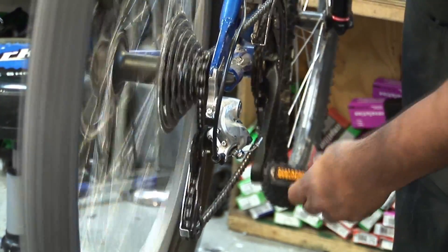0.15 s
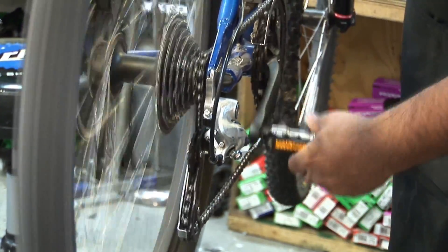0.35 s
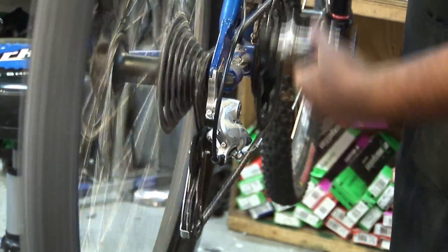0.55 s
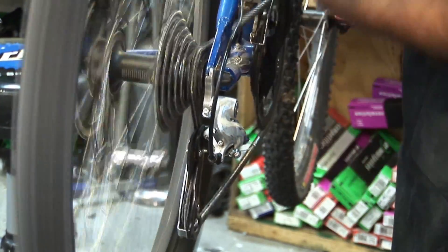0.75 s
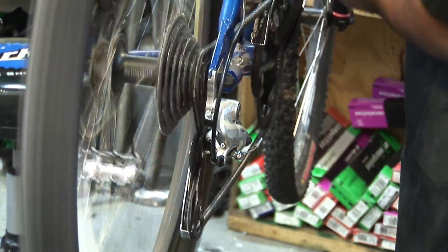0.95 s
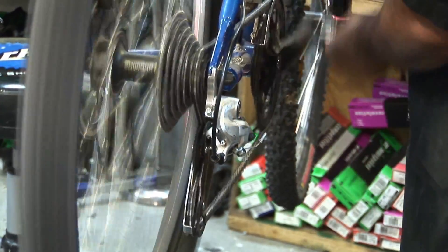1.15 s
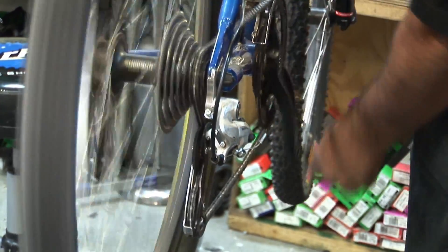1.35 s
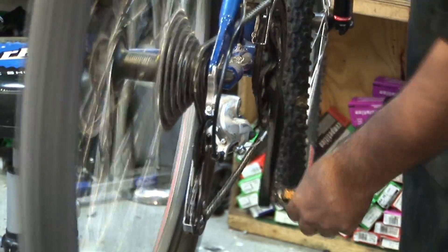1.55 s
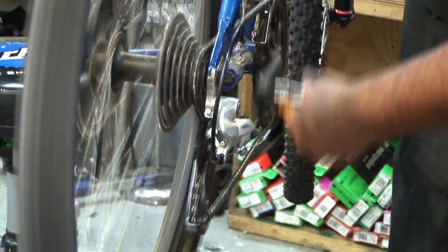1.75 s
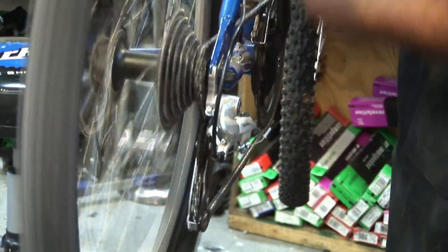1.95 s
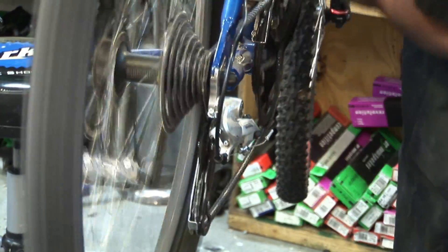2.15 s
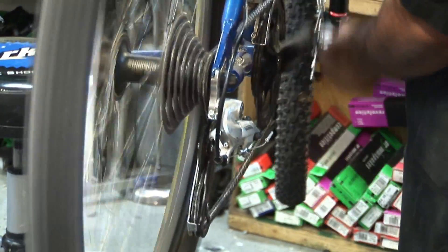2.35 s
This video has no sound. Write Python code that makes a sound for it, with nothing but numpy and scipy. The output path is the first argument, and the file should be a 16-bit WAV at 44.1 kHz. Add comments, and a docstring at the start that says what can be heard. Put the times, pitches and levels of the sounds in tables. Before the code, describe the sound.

A bike chain clacks across rear cogs with crisp metallic clicks while the crank is hand-turned

```python
"""In a small hard workshop, a bicycle on a stand is shifted while the crank is turned by hand.
The shift lever snaps: very short knocks, a low body and a brief ring of fading tones.
The chain clatters onto a cog and its links tick in the treble: runs of tiny random knocks, filtered.
The room adds reflections and a tail, over a faint whirr of random patter, low noise and a hum."""
import sys
import numpy as np
from scipy import signal
from scipy.fft import rfft, irfft
from scipy.io import wavfile
from scipy.ndimage import uniform_filter1d

SR = 44100
rng = np.random.default_rng(int(sys.argv[2]) if len(sys.argv) > 2 else 0)


def to_wav(sig):
    """Store sig (one row per channel, or 1-D mono) as 16-bit WAV at the path in sys.argv[1].

    Samples outside -1..1 are clipped; the rate is SR.
    """
    pcm = np.clip(np.atleast_2d(sig), -1, 1) * 32767
    pcm = np.round(pcm).astype(np.int16)
    wavfile.write(sys.argv[1], SR, pcm.T)  # frames by channels


N = 105354  # length in samples


def amp(db):
    """Turn decibels into a plain multiplier."""
    return 10 ** (np.asarray(db) / 20)


def evened(x):
    """Scale a sound to an average (RMS) strength of 1."""
    return x / np.sqrt(np.mean(x ** 2) + 1e-20)


def read(points, hz):
    """Read a curve of (frequency, value) points, joined by straight lines over log frequency."""
    f, value = np.transpose(points)
    return np.interp(np.log(hz + 1), np.log(f + 1), value)


def add(mix, s, sound):
    """Lay a sound into the mix at s seconds, or at the start if s is negative."""
    part = mix[max(round(s * SR), 0):][:len(sound)]
    part += sound[:len(part)]


def coloured(x, points):
    """Filter with the given spectrum, which drops 30 dB an octave past each end; filter energy is 1."""
    hz = np.fft.rfftfreq(4096, 1 / SR)
    low_end = (points[0][0] / 2, points[0][1] - 30)
    high_end = (points[-1][0] * 2, points[-1][1] - 30)
    log = np.log(amp(read([low_end] + list(points) + [high_end], hz)))
    # minimum phase: the filter answers at once, with nothing ahead of the sound
    both_sides = np.r_[log, log[-2:0:-1]]
    taps = np.fft.ifft(np.exp(np.conj(signal.hilbert(both_sides)))).real[:2048]
    return signal.oaconvolve(x, taps / np.linalg.norm(taps))[:len(x)]


def rattle(rise, length, per_s, spread_db):
    """Many tiny knocks of uneven strength over a little hiss, rising and then dying away."""
    t = np.arange(4000) / SR
    chance = rng.random(len(t))
    strength = rng.exponential(1, len(t))
    hiss = rng.standard_normal(len(t))
    hits = chance < per_s / SR
    knocks = np.sign(hiss) * amp(spread_db * np.minimum(strength, 4)) * hits + 0.3 * hiss
    rising = np.minimum(t / max(rise, 1e-4), 1)
    dying = np.exp(-(t / np.clip(length, .001, .04)) ** 2)
    return evened(knocks) * rising * dying


def whirr():
    """Links running over teeth: a fine random patter whose level wavers a little."""
    # colour of the patter: f/Hz, level per Hz/dB
    patter_colour = [(900, -13.5), (1300, -3.5), (2000, -19), (2900, -2.5), (4200, -10.5), (7000, -24.5),
                     (9000, -20), (12000, -16), (16000, -22)]
    level_db, knocks_per_s = -63.5, 7000
    size = amp(1.0 * np.minimum(rng.exponential(1, N), 4))
    patter = size * (rng.random(N) < knocks_per_s / SR) * rng.choice([-1, 1], N)
    swell = evened(uniform_filter1d(uniform_filter1d(rng.standard_normal(N), 1500), 1500))
    return amp(level_db + 0.8 * swell) * evened(coloured(patter, patter_colour))


def air():
    """Low room noise, a narrow band of rumble and a faint hum whose level wavers."""
    # colour of the room noise: f/Hz, level per Hz/dB
    noise_colour = [(20, -34), (40, -7), (80, -11.5), (130, -4), (200, -12), (260, -7), (330, -13.5),
                    (500, -11.5), (1000, -17.5), (3000, -12.5), (6000, -72)]
    noise_db, rumble_db, hum_db = -64, -73.5, -69.5  # the hum level is a peak, before its wavering
    rumble_hz, rumble_width_hz, hum_hz = 57, 14, 147.8
    hz, t = np.fft.rfftfreq(N, 1 / SR), np.arange(N) / SR
    noise = irfft(rfft(rng.standard_normal(N)) * amp(read(noise_colour, hz)) * (hz > 20), N)
    rumble_band = np.exp(-((hz - rumble_hz) / rumble_width_hz) ** 2)
    rumble = irfft(rfft(rng.standard_normal(N)) * rumble_band, N)
    waver = evened(uniform_filter1d(rng.standard_normal(N), 3000))
    hum = amp(hum_db + 0.99 * waver) * np.sin(2 * np.pi * hum_hz * t)
    return amp(noise_db) * evened(noise) + amp(rumble_db) * evened(rumble) + hum


def lever():
    """A pawl touches, then snaps home: a very short knock, a low body knock, a frame thump and a ring."""
    # lever snaps: t/s, level/dB, knock f/Hz, dull part/dB, low body/dB (parts relative to the snap)
    snaps = [(.0015, -22.5, 3730, -15.5, -30.5), (.0425, -20, 3830, -18, -36),
             (.8315, -47.5, 2940, -10, -24), (0.918, -44.5, 3270, -2.5, -32),
             (.9620, -14.5, 3430, -14.5, -38.5), (1.1227, -22, 4220, -3, -36),
             (1.6491, -37, 3200, -11.5, -35), (1.6863, -17.5, 3910, -7, -34.5),
             (1.8385, -18, 3970, -5.5, -31), (2.1322, -29, 2970, -19, -21.5),
             (2.1456, -20.5, 4070, -8.5, -41), (2.2844, -33.5, 2330, 2, -32), (2.2869, -24, 3930, -16, -35)]
    # ringing tones of the lever: f/Hz, level before random spread/dB, time to fall 60 dB/s
    lever_tones = [(1642, -9, 0.089), (2070, -8, 0.011), (2462, 5.5, 0.032), (2640, -22, 0.052),
                   (3063, 5.5, 0.011), (3464, 2.5, 0.045), (3670, -7, 0.017), (3700, -18, .015),
                   (3806, 13, 0.011), (4470, -8, 0.017), (5440, -21, 0.043), (9170, -34, 0.041)]
    touch_lead_s, touch_db = 0.001371, -16  # the pawl touches just before it snaps
    early_lead_s, early_db, early_hz = 0.00271, -32.5, 1980  # a faint dull knock arrives first
    snap_s, ring_db = 0.00015, -17.5
    dull_hz, crack_hz, crack_db = 2430, 5940, -16.5
    body_hz, body_s = (907, 1080), 0.0017
    thump_hz, thump_db, thump_s = 254.7, -49.5, 0.016  # the frame answers each snap
    centre_s = .001  # each puff is centred this long after its start

    out, t = np.zeros(N), np.arange(6000) / SR
    late = t - centre_s

    def puff(hz, s):
        """A few swings of a tone under a bell-shaped envelope of width s."""
        return np.exp(-(late / s) ** 2 / 2) * np.sin(2 * np.pi * hz * late)

    def swell(s):
        """An envelope that peaks at 1 after s seconds, then dies away."""
        return (t / s) * np.exp(1 - t / s)

    body = sum(np.sin(2 * np.pi * f * t) for f in body_hz) * swell(body_s)
    thump = amp(thump_db) * np.sin(2 * np.pi * thump_hz * t) * swell(thump_s)
    ring_rise = np.minimum(t / 0.000855, 1) ** 2
    for s, db, hz, dull_db, body_db in snaps:
        phases = rng.random(len(lever_tones))
        spreads = rng.standard_normal(len(lever_tones))
        knock = puff(hz, snap_s)
        knock = knock + amp(dull_db) * puff(dull_hz, 1.53 * snap_s)
        knock = knock + amp(crack_db) * puff(crack_hz, 0.53 * snap_s)
        ring = np.zeros(len(t))
        for (f, tone_db, t60), phase, spread in zip(lever_tones, phases, spreads):
            # a snap with a stronger dull part also rings more in the lower tones
            start_db = tone_db + 1.8 * spread + (dull_db + 4.5) * (f < 2700)
            ring += amp(start_db - 60 * t / t60) * np.sin(2 * np.pi * (f * t + phase))
        ring *= ring_rise
        at = s - centre_s
        add(out, at - early_lead_s, amp(db + early_db) * puff(early_hz, 0.001))
        add(out, at - touch_lead_s, amp(db + touch_db) * (knock + amp(ring_db + 8) * ring))
        add(out, at, amp(db) * (knock + thump + amp(body_db) * body + amp(ring_db) * ring))
    return out


def chain():
    """The chain drops onto a cog in a short clatter with a thud through the frame; links tick above it."""
    # chain landings: t/s, level before trim/dB, rise/s, length/s, low thud/dB, bright part/dB
    # (thud and bright part are relative to the clatter)
    landings = [(0.154, -59.5, 0.0022, 0.01, -20, 17.5), (0.169, -46.5, 0.0012, 0.0079, -28, 9.5),
                (0.182, -28, 0.0014, 0.0067, -17, -2), (0.288, -39.5, 0.0014, 0.0059, -17, 2.5),
                (0.297, -42, 0.0026, 0.011, -3.5, -18), (0.551, -37.5, 0.00068, 0.0058, -14, 4),
                (0.697, -40.5, 0.0054, 0.0064, -13, -10), (1.002, -40, 0.0027, 0.015, -7.5, -16),
                (1.282, -27, 0.0059, 0.02, -9, -43), (1.529, -65, .002, 0.025, -18, 14),
                (1.939, -42, 0.0027, 0.0066, -20, 7), (2.047, -43, 0.002, 0.028, -8, -3.5),
                (2.078, -42, 0.0033, 0.0074, -4.5, -17), (2.109, -41.5, 0.0044, .006, -3, -1),
                (2.118, -30.5, 0.0027, .011, -6.5, 3), (2.278, -47, 0.002, 0.0074, -23, -2.5)]
    # links ticking on the jockey wheels: t/s, level before trim/dB, length (held to 0.04 at most)/s
    link_ticks = [(0.0004, -29, 0.0071), (0.0387, -32, 0.021), (0.1474, -45.5, 0.015),
                  (0.1714, -47.5, 0.036), (0.2838, -36, 0.0065), (0.38, -74, 0.017), (0.412, -56, 0.0081),
                  (0.445, -57, 0.018), (0.551, -41, 0.0079), (0.633, -54, 0.011), (0.676, -54.5, 0.014),
                  (0.725, -64, 0.011), (0.862, -54, 0.017), (0.9603, -31, 0.0087), (1.002, -35.5, 0.011),
                  (1.12, -36.5, 0.016), (1.219, -49.5, 0.034), (1.257, -50.5, 0.024), (1.289, -55.5, 0.03),
                  (1.359, -49, 0.011), (1.53, -55.5, 0.028), (1.568, -51, 0.033), (1.613, -48.5, 0.0095),
                  (1.665, -51, 0.012), (1.684, -37, 0.017), (1.835, -41.5, 0.024), (1.909, -54, 0.043),
                  (1.9604, -53.5, 0.033), (2.03, -49, 0.014), (2.049, -49.5, 0.015), (2.072, -45.5, 0.012),
                  (2.117, -29.5, 0.016), (2.137, -38.5, 0.017), (2.217, -50.5, 0.013), (2.278, -41, 0.036)]
    # colours of the four parts: f/Hz, level per Hz/dB
    clatter_colour = [(410, -42.5), (700, -6.5), (2060, -2), (2520, -5.5), (3030, -1), (6390, -35.5),
                      (9000, -36), (11700, -44), (19800, -120)]
    thud_colour = [(100, -6.5), (220, 0), (400, -2), (900, -6.5), (1500, -10), (3000, -67)]
    bright_colour = [(2000, -17.5), (3000, -4), (4000, -2.5), (5500, -16.5), (8000, -46)]
    tick_colour = [(3530, -50), (6000, -5.5), (6900, -13.5), (7520, -11), (9860, -0.5), (10700, 0.5),
                   (13800, 0), (16000, -1)]
    clatter_trim_db, tick_trim_db = -12, -11
    clatter, thud, bright, tick = np.zeros((4, N))
    for s, db, rise, length, thud_db, bright_db in landings:
        for part, part_db in ((clatter, 0), (thud, thud_db), (bright, bright_db)):
            level = amp(db + clatter_trim_db + part_db)
            add(part, s, level * rattle(rise, length, per_s=1500, spread_db=3.0))
    for s, db, length in link_ticks:
        add(tick, s, amp(db + tick_trim_db) * rattle(0.00058, length, per_s=5000, spread_db=0.83))
    out = coloured(clatter, clatter_colour) + coloured(thud, thud_colour)
    return out + coloured(bright, bright_colour) + coloured(tick, tick_colour)


def shop(x):
    """A few strong reflections, plus five tails of sparse taps whose bands die at their own speed."""
    # strong reflections: delay/s, level/dB
    reflections = [(.0036, -10), (.0065, -6.5), (.0095, -12.5), (0.0129, -20), (.017, -17)]
    # how long the tail lasts: f/Hz, time to fall 60 dB/s
    tail_t60 = [(250, 0.56), (660, 0.34), (1740, 0.24), (4590, 0.23), (12100, 0.17)]
    # colour of the tail: f/Hz, level/dB
    tail_colour = [(300, -2), (2500, -1), (3600, -3.5), (4500, -5), (7000, -2.5), (12000, 0)]
    tail_db, tail_rise_s = 2, 0.0024

    # one tap, up or down, at a random place in every 10 samples
    taps = np.zeros((5, SR // 2))
    at = np.arange(0, SR // 2 - 10, 10) + rng.integers(0, 10, (5, SR // 20 - 1))
    np.put_along_axis(taps, at, rng.choice([-1., 1.], at.shape), 1)

    # colour the taps and fade each band
    hz, t, bands = signal.stft(taps, SR, nperseg=256)
    fade_db = -60 * t / read(tail_t60, hz)[:, None]
    bands = bands * amp(read(tail_colour, hz)[:, None] + fade_db)
    tail = signal.istft(bands, SR, nperseg=256)[1]
    tail = tail * np.minimum(np.arange(tail.shape[1]) / SR / tail_rise_s, 1) ** 2

    # the feed to each tail swings at its own speed, so the mix of tails keeps changing
    swing_hz = np.arange(1, 6)[:, None] * 2 / 3
    swing = 2 * np.pi * swing_hz * np.arange(N) / SR + np.arange(5)[:, None]
    feeds = x * np.cos(swing) * np.sqrt(2 / 5)
    wet = signal.fftconvolve(feeds, tail, axes=1)[:, :N].sum(0)
    out = x + amp(tail_db) * wet / np.linalg.norm(tail[0])
    for s, db in reflections:
        add(out, s, amp(db) * x)
    return out


def scene():
    """Lever and chain sound in the room; the whirr and air are added without its echoes."""
    return (shop(lever() + chain()) + whirr() + air())[None]


def record(dry):
    """Band limit of the recorder: a steep filter takes away the highest treble."""
    edge_hz = 16100
    taps = signal.firwin(511, edge_hz, window=("kaiser", 9), fs=SR)
    return signal.oaconvolve(dry, taps[None], "same")


dry = scene()
out = record(dry)
to_wav(out)
```